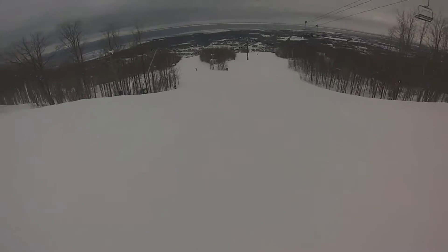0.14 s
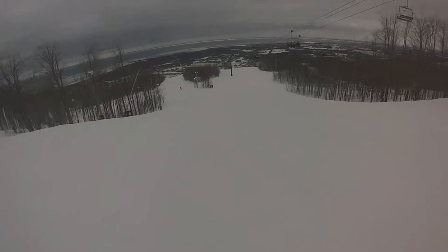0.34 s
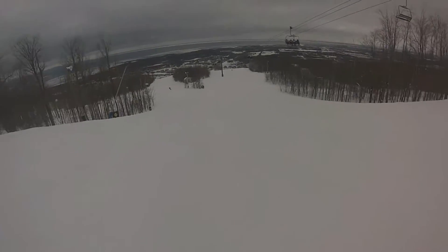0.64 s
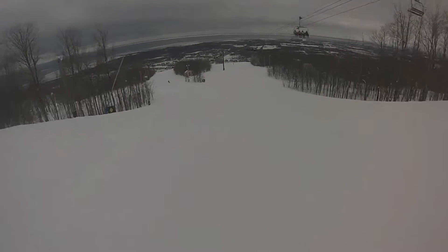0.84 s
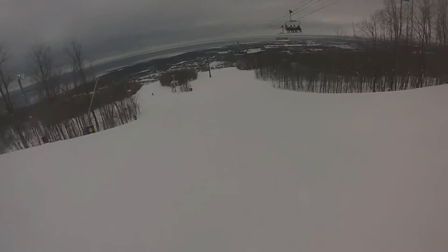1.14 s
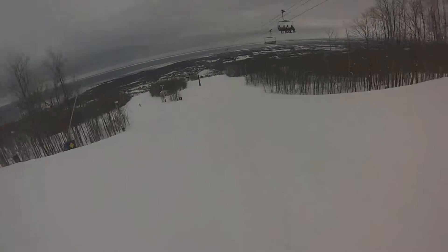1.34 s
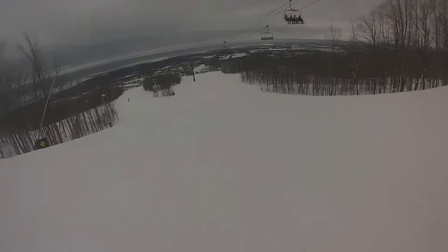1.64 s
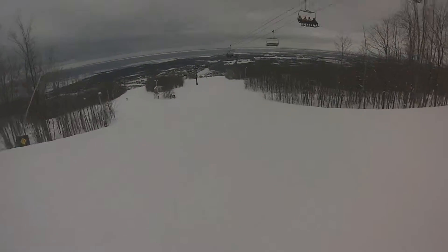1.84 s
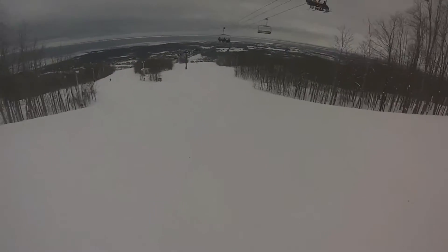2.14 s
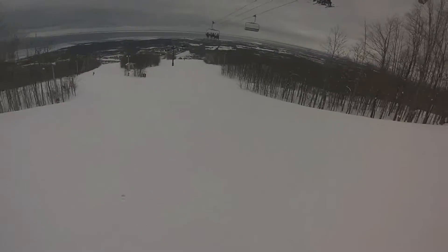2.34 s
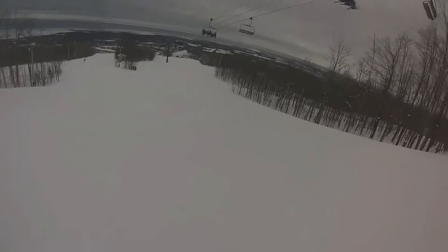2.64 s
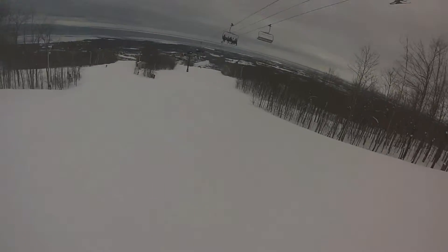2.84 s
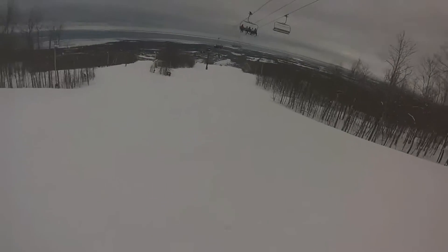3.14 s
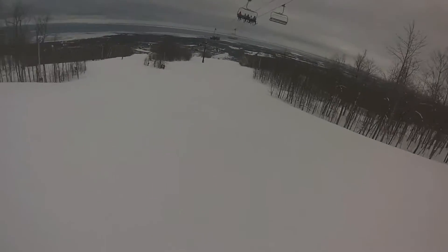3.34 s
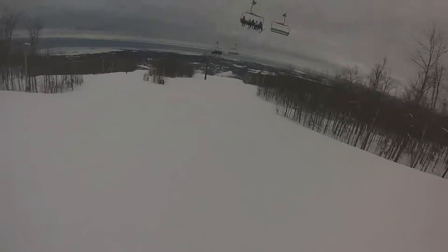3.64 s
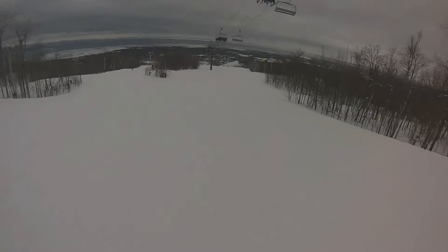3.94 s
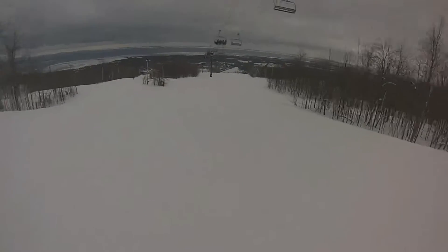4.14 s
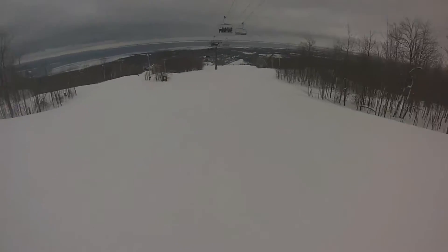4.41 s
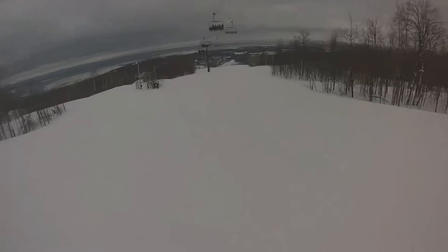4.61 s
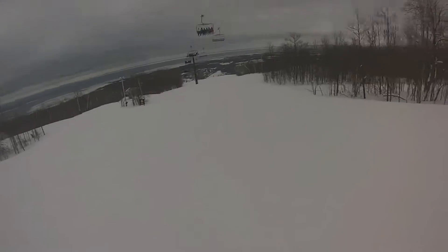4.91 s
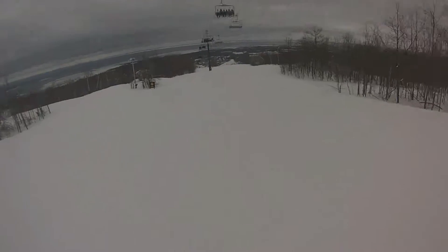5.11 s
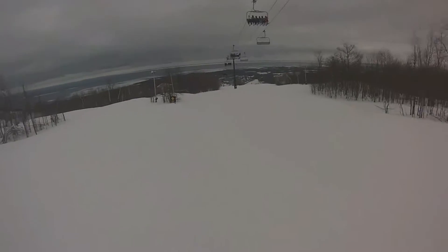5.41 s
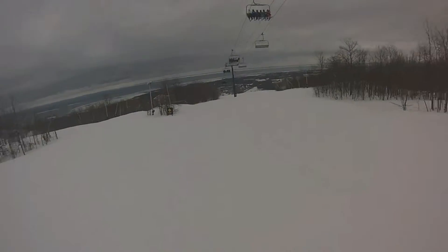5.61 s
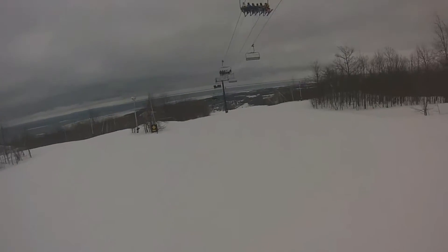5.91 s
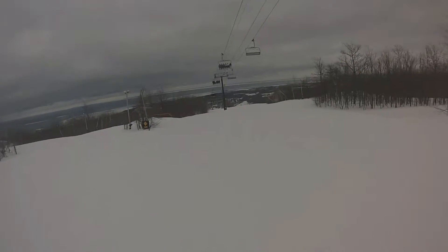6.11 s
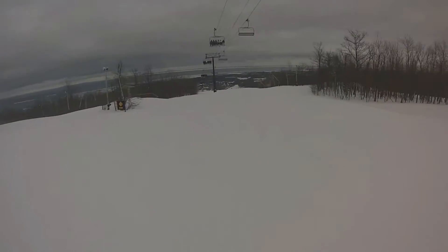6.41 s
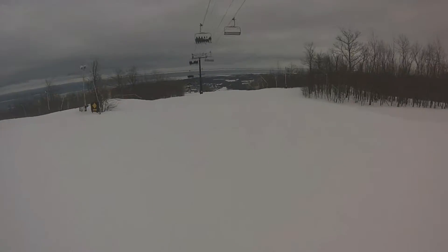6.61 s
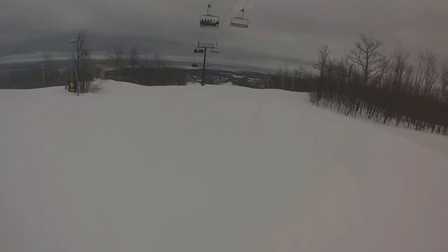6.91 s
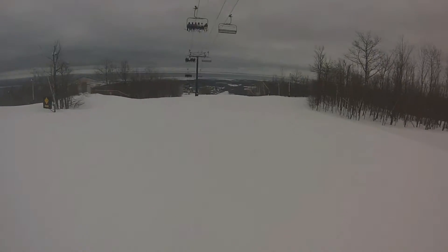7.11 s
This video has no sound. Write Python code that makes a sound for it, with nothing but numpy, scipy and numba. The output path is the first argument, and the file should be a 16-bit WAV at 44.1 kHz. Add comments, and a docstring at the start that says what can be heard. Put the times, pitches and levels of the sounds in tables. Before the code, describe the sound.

Heard from a helmet camera in a sealed case, skis glide down an open groomed slope. Soft, boxy hiss and air come first; within a second edges scrape and the hiss flutters. Grit, bright spray and a narrow airy whistle build unevenly, with deep bobbing thumps, the strongest shortly after five seconds. It stays loud to the end.

```python
"""A skier runs down a groomed slope with a camera in a sealed case on the helmet.
At first snow hiss and rushing air are soft: noise reaching the microphone through the ringing modes of the case.
Within a second the edges scrape, and the sliding hiss flutters in brief swells; the mount's bass is bobbing noise.
Glide, grit and air then grow unevenly; bright spray, shaped noise, and a narrow whistling band join them.
Near 5.3 s the bass shaking is strongest, and the run stays loud to the end over faint microphone hiss."""
import sys
import numpy as np
from scipy import signal
from scipy.fft import rfft, irfft, next_fast_len
from scipy.io import wavfile
from scipy.ndimage import uniform_filter1d
from numba import njit

SR = 44100
rng = np.random.default_rng(int(sys.argv[2]) if len(sys.argv) > 2 else 0)


def persist_wave(psi):
    """Save psi, clipped to +-1, as 16-bit WAV."""
    counts = np.round(np.clip(psi, -1, 1) * 32767).astype(np.int16)
    wavfile.write(sys.argv[1], SR, np.atleast_2d(counts).T)


N = 320166

# Snow under the skis, before flutter and surges. Each row: start in seconds, level of the glide hiss
# in its main modes in dB, level in its upper modes in dB, level of the edge bite in dB.
GLIDE_CURVE = [(0.0, -61.5, -68, -67), (0.18, -64.5, -64.5, -68), (0.97, -56.5, -58.5, -63),
               (0.99, -59, -61.5, -64), (1.41, -61, -59.5, -63), (1.86, -58.5, -64.5, -64),
               (1.96, -56.5, -58.5, -65), (2.06, -59, -65, -60.5), (2.22, -55, -61, -64),
               (2.34, -53.5, -59.5, -59.5), (2.71, -55, -58.5, -60.5), (2.87, -51, -65, -60),
               (2.97, -52.5, -60, -62), (3.32, -54, -59, -59), (3.37, -48.5, -54, -57.5),
               (3.62, -54.5, -59.5, -57.5), (3.74, -50.5, -55, -56), (3.78, -55, -63, -57),
               (3.8, -61, -58, -57), (3.84, -53.5, -58.5, -57), (4.49, -53.5, -56.5, -57.5),
               (4.51, -58, -55, -56), (4.57, -53, -58, -57.5), (4.63, -59, -61, -58),
               (4.69, -54.5, -55.5, -55), (4.75, -59, -57, -57), (4.81, -51.5, -57, -55.5),
               (4.91, -56.5, -56.5, -56.5), (5.09, -50, -52.5, -55.5), (5.13, -60, -63, -57.5),
               (5.17, -63, -60, -57.5), (5.28, -51.5, -53.5, -57.5), (5.34, -54.5, -59.5, -56.5),
               (5.46, -50.5, -55, -54.5), (5.5, -52.5, -60, -55.5), (5.66, -52.5, -60, -56),
               (6.05, -51, -53, -56), (6.11, -50, -59, -56), (6.19, -52.5, -54.5, -56),
               (6.41, -49.5, -57, -53), (6.43, -50.5, -59, -55), (6.53, -49.5, -53, -57),
               (6.57, -53, -56, -54), (6.69, -49.5, -54, -55.5), (6.91, -51, -59, -54.5),
               (6.93, -48.5, -53, -57), (7.0, -50, -56, -55), (7.1, -49, -53, -56.5),
               (7.2, -51, -55, -57.5), (7.26, -51, -55, -60)]
# Edges in the snow, before surges. Each row: start in seconds, level of the scrape in dB,
# level of the spray in dB, level of the whistling band in dB.
EDGE_CURVE = [(0, -85, -94, -85), (.34, -88, -93, -89.5), (.45, -81.5, -91, -80), (.69, -80, -92, -86),
              (.75, -73, -89, -78), (.85, -74, -84.5, -78), (.97, -77.5, -89, -80), (1.08, -78, -89, -83),
              (1.2, -77, -92, -83), (1.32, -74, -89, -76), (1.45, -77.5, -91, -81), (1.62, -81, -93, -77),
              (2.15, -80, -92, -77), (2.4, -77, -88, -72), (2.68, -77.5, -88.5, -72.5),
              (3.0, -75.5, -92, -80.5), (3.3, -74.5, -90, -73), (3.5, -70.5, -83, -67.5),
              (3.64, -72.5, -90, -73), (3.77, -70, -84, -69.5), (4.15, -72, -87, -72),
              (4.45, -70, -82, -70), (4.53, -69, -81, -71), (4.75, -70, -78, -74), (4.86, -69.5, -77, -69),
              (4.93, -70, -76, -71), (4.98, -71, -81, -78), (5.12, -68.5, -76, -69), (5.2, -70, -80, -71),
              (5.26, -73, -84, -79), (5.31, -68.5, -78, -76), (5.45, -68, -80, -69),
              (5.75, -70, -86.5, -75), (5.95, -67.5, -83, -71), (6.2, -70.5, -85.5, -72),
              (6.42, -67, -83, -66.5), (6.65, -67.5, -78, -65), (6.85, -68, -80, -65.5),
              (7.05, -69.5, -81, -68.5), (7.26, -71, -88, -70)]
# Air and case, before flutter and wavering. Each row: start in seconds, level of the air rush in dB,
# level of the upper hollow mode of the case in dB, level of the lower skirt of the glide band in dB.
AIR_CURVE = [(0, -66, -75, -65), (.3, -71, -74.5, -68), (.7, -68.5, -73, -64), (.86, -65.5, -72, -59.5),
             (1.1, -65.5, -72.5, -65), (1.65, -66, -74.5, -70), (2.05, -67.5, -72.5, -71),
             (2.5, -65, -69, -64.5), (2.92, -66, -70, -73), (3.2, -67.5, -66, -70), (3.5, -62.5, -70, -60),
             (3.7, -62.5, -68, -68), (4.1, -61, -74, -60.5), (4.4, -60.5, -65, -59.5),
             (4.6, -59, -64.5, -59), (4.85, -61, -66, -57), (5.08, -61, -64.5, -61.5),
             (5.27, -61.5, -72, -59), (5.46, -57.5, -63, -55.5), (5.76, -61, -68, -58.5),
             (5.94, -59.5, -70, -60), (6.15, -62, -67.5, -61.5), (6.43, -57.5, -68, -63.5),
             (6.72, -59.5, -73, -67), (6.85, -59, -69.5, -57.5), (7.1, -63, -64.5, -66),
             (7.26, -66, -72, -63)]
# Grit and valley, before surges. Each row: start in seconds, level of the gritty upper band of the bite in dB,
# level of the band between the hollow mode and the glide in dB.
GRIT_CURVE = [(0.0, -77.5, -82), (0.55, -73, -77), (0.73, -73.5, -85), (0.87, -67, -67.5), (0.98, -71, -75),
              (1.1, -73.5, -77), (1.33, -71.5, -78), (1.6, -72.5, -80), (2.67, -67.5, -68),
              (2.97, -70, -78), (3.01, -70, -70), (3.26, -69.5, -72), (3.52, -63, -63), (3.66, -68, -70),
              (3.78, -62, -79), (3.96, -65.5, -69), (4.53, -64, -74), (4.59, -62.5, -66),
              (4.89, -63, -68.5), (4.93, -64.5, -64), (5.07, -61.5, -70), (5.11, -64, -65),
              (5.3, -62.5, -71), (5.88, -64, -68), (5.9, -62.5, -75), (6.05, -64.5, -73.5),
              (6.81, -60, -66.5), (6.85, -62, -65.5), (7.22, -65.5, -68), (7.26, -66, -69)]


def undb(db):
    """Logarithmic level: the amplitude gain of a level in dB."""
    return 10 ** (np.asarray(db) / 20)


def level(x, db):
    """Root-mean-square level: scale a signal to a level in dB re 1."""
    return x * undb(db) / np.sqrt(np.mean(x ** 2))


def curves(table):
    """Linear interpolation in time: the columns of a table, one value per sample."""
    seconds, *columns = np.transpose(table)
    return [np.interp(np.arange(N) / SR, seconds, column) for column in columns]


def walk(rate):
    """Slow random modulation: levels held 1 / rate seconds and slewed twice, spread about 0.7."""
    hold = int(SR / rate)
    steps = np.repeat(rng.standard_normal(N // hold + 1), hold)
    slewed = uniform_filter1d(uniform_filter1d(steps, hold), hold)
    return 0.95 * slewed[:N]


def coloured(shape):
    """Spectral shaping: white noise weighted by a spectrum over log frequency, rms 1."""
    hz, db = np.transpose(shape)
    f = np.maximum(np.arange(N // 2 + 1) * SR / N, 1.)
    gain = undb(np.interp(np.log(f), np.log(hz), db, left=-60, right=-60))
    return level(irfft(rfft(rng.standard_normal(N)) * gain, N), 0)


@njit
def resonate(x, hz, width):
    """Second-order resonance: a state-variable band-pass with a moving centre, gain 1 at the centre."""
    y, band, low = np.empty(len(x)), 0., 0.
    for i in range(len(x)):
        g = np.tan(np.pi * hz[i] / SR)
        damping = width / hz[i]
        v = (band + g * (x[i] - low)) / (1 + g * (g + damping))
        band, low = 2 * v - band, low + 2 * g * v
        y[i] = damping * v
    return y


def ring(modes, drift, flicker_db):
    """Modal superposition: noise-driven modes of drifting centre and wavering strength, rms 1."""
    out = 0
    for hz, width, db in modes:
        centre = hz * (1 + drift * walk(2.06))
        # two resonances in a row narrow the band back to about the stated width
        once = resonate(rng.standard_normal(N), centre, 1.5 * width)
        tone = resonate(once, centre, 1.5 * width)
        # a wider mode passes more noise power
        out = out + level(tone, db + 10 * np.log10(width) + flicker_db * walk(3.59))
    return level(out, 0)


def through_case(modes, shape, between_db, drift, flicker_db, rough_db, rough_hz):
    """Resonant transmission: a source heard in the modes and between them, roughened in level, rms 1."""
    x = ring(modes, drift, flicker_db) + undb(between_db) * coloured(shape)
    return level(x * undb(rough_db * walk(rough_hz)), 0)


def hiss_flutter():
    """Amplitude modulation: brief level changes of the sliding hiss, in dB."""
    # Brief level changes of the hiss. Each row: centre in seconds, change in dB, a rise or a slight dip.
    changes = [(.44, 4), (.8, 2.5), (.85, -1), (.89, 1), (.95, 4), (1.07, 6), (1.31, 3.5), (1.9, -0.5),
               (2.81, 4), (2.875, 2.5), (2.93, 2), (3.1, 4), (3.39, 0), (3.425, 2), (4.57, 5), (4.69, 2),
               (4.82, 4), (5.09, -0.5), (5.99, 4.5), (6.53, 1), (6.95, 3.5), (7.09, 3.5)]
    spread_s = 0.015  # from the centre to 1/e of the change
    t = np.arange(N) / SR
    change_db = sum(db * np.exp(-((t - s) / spread_s) ** 2) for s, db in changes)
    # the hiss also flutters at random, in fast and slower wavering
    return change_db + 1.1 * walk(35.) + 0.73 * walk(12.)


def glide(flutter_db):
    """Friction noise filtered by resonance: sliding snow hiss in the main and upper case modes."""
    # Main case modes rung by the glide. Each row: centre in Hz, width in Hz, relative level in dB per Hz.
    main_modes = [(1414.6, 115, 3.5), (1502, 117, -2)]
    # Upper case modes rung by the glide. Each row: centre in Hz, width in Hz, relative level in dB per Hz.
    upper_modes = [(1642, 108, 2.5), (1582, 61, -8), (1705, 98, -6)]
    main_db, upper_db, _ = curves(GLIDE_CURVE)
    main = undb(main_db + flutter_db) * ring(main_modes, drift=0.0025, flicker_db=0.7)
    upper = undb(upper_db + 0.45 * flutter_db) * ring(upper_modes, drift=0.0027, flicker_db=0.8)
    return main + upper


def skirt_and_valley(flutter_db):
    """Band-limited noise: the lower skirt of the glide band and the valley beneath it."""
    # Spectrum of the skirt. Each row: frequency in Hz, relative level in dB per Hz.
    skirt_shape = [(950, -34), (1060, -8.5), (1200, 3.5), (1290, 7), (1380, -5), (1500, -28)]
    # Spectrum of the valley. Each row: frequency in Hz, relative level in dB per Hz.
    valley_shape = [(560, -15), (800, -0.5), (950, 1.5), (1080, -5.5), (1200, -23)]
    skirt_db = curves(AIR_CURVE)[2] + 0.55 * flutter_db + 0.57 * walk(16.)
    valley_db = curves(GRIT_CURVE)[1]
    return undb(skirt_db) * coloured(skirt_shape) + undb(valley_db) * coloured(valley_shape)


def bite(flutter_db, surge_db):
    """Resonant transmission of cutting noise: the edges bite and the case modes colour it."""
    # Case modes rung by the bite. Each row: centre in Hz, width in Hz, relative level in dB per Hz.
    modes = [(1968, 193, -2), (2312, 256, 1.9), (2533, 147, -0.5)]
    # Bite passing between the modes. Each row: frequency in Hz, relative level in dB per Hz.
    between = [(1100, -25), (1750, -4), (1950, 1.5), (2700, -2.5), (3000, -13), (3600, -29)]
    x = through_case(modes, between, between_db=-5., drift=0.01, flicker_db=0.4, rough_db=0.55, rough_hz=25.03)
    return undb(curves(GLIDE_CURVE)[2] + 0.51 * surge_db + 0.18 * flutter_db) * x


def grit(surge_db):
    """Resonant transmission of rough noise: the gritty upper band of the bite."""
    # Case mode rung by the grit. Each row: centre in Hz, width in Hz, relative level in dB per Hz.
    modes = [(3274, 430, -3)]
    # Grit passing beside the mode. Each row: frequency in Hz, relative level in dB per Hz.
    between = [(2500, -18), (2900, -1.5), (4000, -8), (5700, -15), (7000, -19.5)]
    x = through_case(modes, between, between_db=3., drift=0.006, flicker_db=0.3, rough_db=0.6, rough_hz=25.)
    return undb(curves(GRIT_CURVE)[0] + 0.46 * surge_db) * x


def edge_surges():
    """Common modulation: the bright sounds rise and fall together at random, in dB."""
    return 0.5 * walk(16.) + 0.6 * walk(30.)


def scrape():
    """Resonant transmission of scraping noise: the edges scrape through high case modes."""
    # Case modes rung by the scrape. Each row: centre in Hz, width in Hz, relative level in dB per Hz.
    modes = [(6490, 700, -2), (7080, 270, -6)]
    # Scrape passing between the modes. Each row: frequency in Hz, relative level in dB per Hz.
    between = [(4500, -11), (5300, 1.5), (5750, -11), (6400, -2.5), (7500, -5), (8500, -13), (10000, -33)]
    x = through_case(modes, between, between_db=2., drift=0.008, flicker_db=0.4, rough_db=0.9, rough_hz=18.)
    return undb(curves(EDGE_CURVE)[0]) * x


def rasp():
    """Narrow-band resonance: a rasp just under the whistling band."""
    # Mode of the rasp. Each row: centre in Hz, width in Hz, relative level in dB per Hz.
    modes = [(4500, 370, 0)]
    # Rasp before surges. Each row: start in seconds, level in dB.
    rasp_curve = [(0.0, -87), (0.08, -85), (0.38, -88), (0.97, -74.5), (1.01, -81), (1.35, -77),
                  (1.58, -82), (2.36, -77), (2.38, -73), (3.11, -79.5), (3.42, -72), (3.68, -76),
                  (3.74, -70), (4.06, -75), (5.09, -74), (5.24, -80), (5.48, -69), (5.56, -77), (5.82, -75),
                  (5.94, -70), (6.11, -77), (6.63, -68.5), (7.24, -73), (7.26, -77)]
    return undb(curves(rasp_curve)[0]) * ring(modes, drift=0.006, flicker_db=0.3)


def spray():
    """Band-limited noise: thrown snow as a bright, wavering hiss."""
    # Spectrum of the spray. Each row: frequency in Hz, relative level in dB per Hz.
    spray_shape = [(6500, -19), (8000, -4), (9300, -0.5), (10200, -5.5), (11000, -7.5), (12500, -20)]
    return undb(curves(EDGE_CURVE)[1] + 1.3 * walk(18.)) * coloured(spray_shape)


def mist():
    """Level coupling: the finest top of the spray rises with both spray and scrape."""
    # Spectrum of the mist. Each row: frequency in Hz, relative level in dB per Hz.
    mist_shape = [(8500, -19), (10000, -7.5), (10800, 3.5), (12000, -1), (13200, 1)]
    scrape_db, spray_db, _ = curves(EDGE_CURVE)
    full_mist_db, full_spray_db, full_scrape_db = -85, -80, -70  # levels that occur together
    per_spray, per_scrape = 0.49, 0.18  # dB gained per dB of each
    mist_db = full_mist_db + per_spray * (spray_db - full_spray_db) + per_scrape * (scrape_db - full_scrape_db)
    return undb(mist_db + 2.3 * walk(14.)) * coloured(mist_shape)


def whistle(surge_db):
    """Narrow-band resonance: noise in closely spaced modes makes a whistling band."""
    # Modes of the whistle. Each row: centre in Hz, width in Hz, relative level in dB per Hz.
    modes = [(4890, 105, 0.5), (5020, 105, -0.5), (4900, 600, -10.5)]
    return undb(curves(EDGE_CURVE)[2] + 0.89 * surge_db) * ring(modes, drift=0.003, flicker_db=0.4)


def air_rush():
    """Broadband flow noise: rushing air as shaped noise of wavering level."""
    # Spectrum of the air rush. Each row: frequency in Hz, relative level in dB per Hz.
    air_shape = [(30, -16), (60, -5), (100, -3.5), (160, -1.5), (300, -0.5), (420, -5.5), (620, -9.5),
                 (1000, -13), (1500, -31)]
    return undb(curves(AIR_CURVE)[0] + 0.85 * walk(4.48)) * coloured(air_shape)


def case_boom():
    """Modal resonance: noise rings the lowest mode of the case."""
    # Lowest case mode. Each row: centre in Hz, width in Hz, relative level in dB per Hz.
    modes = [(334, 40, 0)]
    # Lowest case mode over time. Each row: start in seconds, level in dB.
    boom_curve = [(0, -78), (.45, -69.5), (.75, -76), (1.5, -70), (1.9, -71.5), (2.3, -68), (2.5, -64),
                  (3.0, -73), (3.5, -65.5), (4.0, -65.5), (4.5, -60), (4.92, -64), (5.06, -67.5),
                  (5.2, -70), (5.48, -60.5), (5.76, -70), (5.96, -57), (6.22, -69.5), (6.38, -58.5),
                  (6.85, -69), (7.08, -61), (7.26, -77)]
    return undb(curves(boom_curve)[0]) * ring(modes, drift=0.008, flicker_db=0.)


def case_hollow():
    """Modal resonance: noise rings the upper hollow modes of the case."""
    # Hollow case modes. Each row: centre in Hz, width in Hz, relative level in dB per Hz.
    modes = [(735, 30, 1.5), (682, 55, -4)]
    return undb(curves(AIR_CURVE)[1] + 1.1 * walk(16.)) * ring(modes, drift=0.0033, flicker_db=1.9)


def mount_shake():
    """Inertial low-pass: head and mount bob in the deep bass, with swings more even than noise."""
    # Spectrum of the bobbing. Each row: frequency in Hz, relative level in dB per Hz.
    bob_shape = [(3, -21), (8, -1), (15, 2.5), (24, 0.5), (34, 3), (43, -1.5), (53, -23), (80, -30)]
    # Push on the mount before wavering and inertia. Each row: start in seconds, level in dB.
    shake_curve = [(0.0, -75), (0.08, -52), (0.12, -66), (0.3, -67), (0.36, -50.5), (0.48, -67),
                   (0.67, -49), (0.71, -59), (0.81, -48), (0.85, -59), (0.93, -51), (1.11, -54.5),
                   (1.17, -68), (1.25, -51.5), (1.31, -65), (1.35, -54.5), (1.62, -62.5), (1.94, -68),
                   (1.98, -54), (2.06, -60.5), (2.22, -54.5), (2.3, -71), (2.61, -56.5), (2.77, -63),
                   (2.89, -49.5), (3.01, -56), (3.03, -54), (3.17, -53), (3.21, -50), (3.34, -59),
                   (3.39, -49), (3.5, -67), (3.6, -55), (3.64, -62), (3.7, -46), (3.78, -65), (3.86, -55),
                   (4.14, -65.5), (4.59, -51.5), (4.61, -59), (4.79, -59), (4.85, -45.5), (4.89, -54),
                   (5.11, -49), (5.22, -61), (5.28, -37), (5.54, -66), (5.6, -52), (5.7, -50),
                   (5.74, -44.5), (5.84, -64), (5.96, -57), (6.21, -61), (6.27, -50), (6.49, -58),
                   (6.53, -55), (6.65, -50), (6.67, -58), (7.16, -64), (7.26, -55)]
    evenness, head_hz = 0.86, 59.5  # 1 would divide out the whole envelope; cutoff of each filter pass in Hz
    x = coloured(bob_shape)
    envelope = np.abs(signal.hilbert(x, next_fast_len(N))[:N])
    swing = uniform_filter1d(envelope, SR // 50)
    # the bass level also wavers quickly at random
    push_db = curves(shake_curve)[0] + 2.5 * walk(50.)
    pushed = level(x / swing ** evenness, 0) * undb(push_db)
    # the mass of the head cannot follow quick jolts
    return signal.sosfiltfilt(signal.butter(2, head_hz, fs=SR, output="sos"), pushed)


def microphone_hiss():
    """Self-noise: the faint shaped hiss of the microphone."""
    # Spectrum of the self-noise. Each row: frequency in Hz, relative level in dB per Hz.
    hiss_shape = [(3000, -12), (8000, -4), (13500, -2)]
    return undb(-99) * coloured(hiss_shape)


def scene():
    """Linear superposition: snow, edges, air and mount add at the microphone."""
    flutter_db = hiss_flutter()
    surge_db = edge_surges()
    snow = glide(flutter_db) + skirt_and_valley(flutter_db) + bite(flutter_db, surge_db) + grit(surge_db)
    edge = undb(surge_db) * (scrape() + rasp() + spray() + mist())
    wind = whistle(surge_db) + air_rush() + case_boom() + case_hollow()
    return (snow + edge + wind + mount_shake())[None]


def record(dry):
    """Band-limiting: the microphone adds its hiss and the camera cuts the top."""
    x = dry + microphone_hiss()
    top_hz = 12900
    return signal.sosfilt(signal.ellip(8, .2, 60, top_hz, fs=SR, output="sos"), x)


dry = scene()
out = record(dry)
persist_wave(out)
```